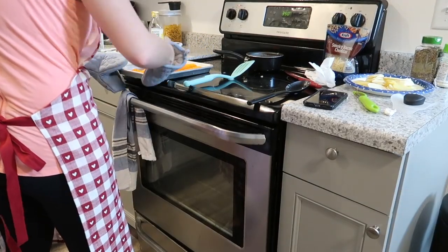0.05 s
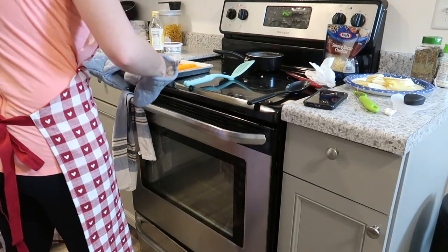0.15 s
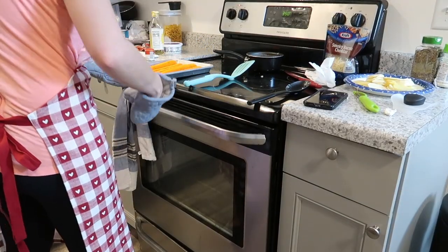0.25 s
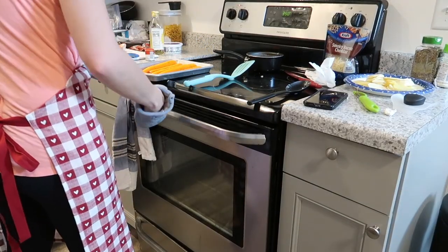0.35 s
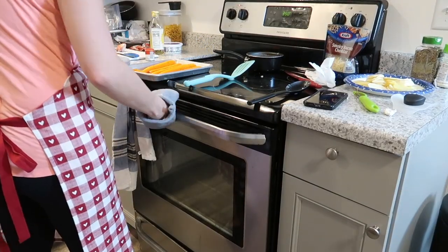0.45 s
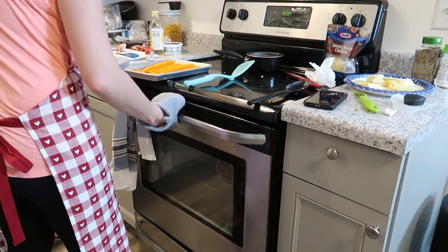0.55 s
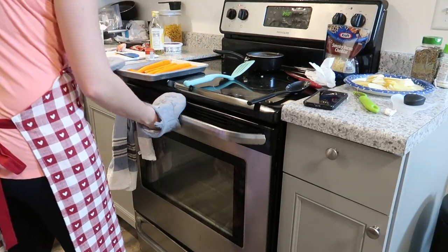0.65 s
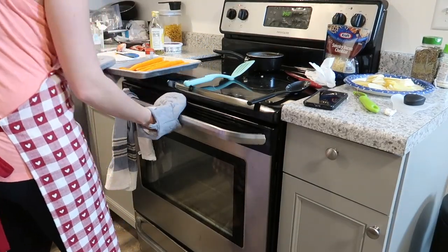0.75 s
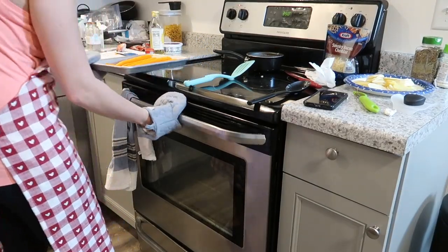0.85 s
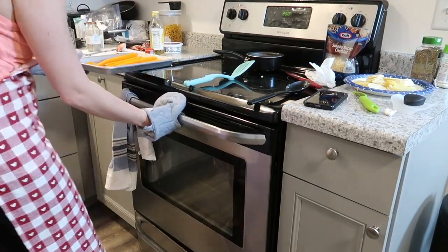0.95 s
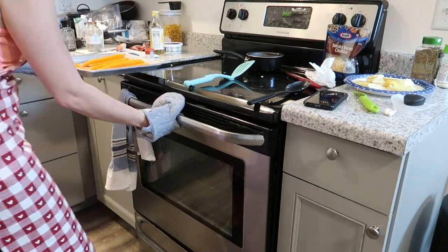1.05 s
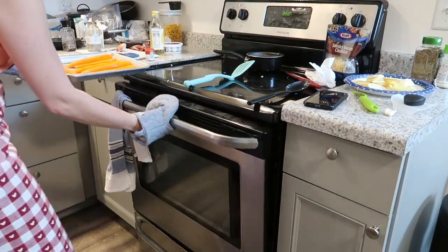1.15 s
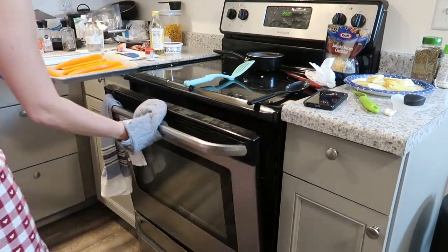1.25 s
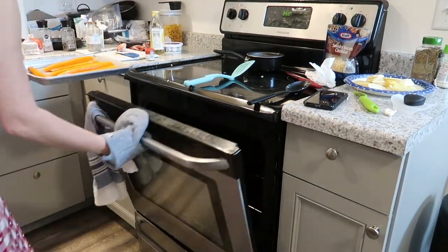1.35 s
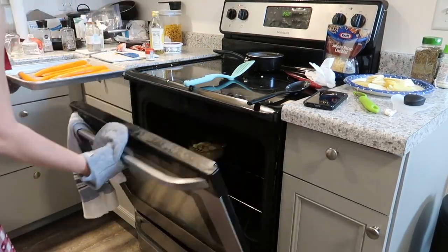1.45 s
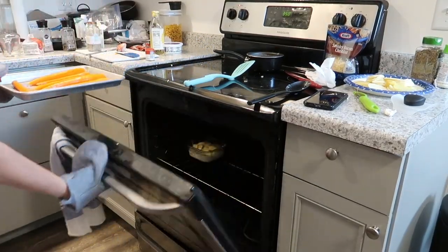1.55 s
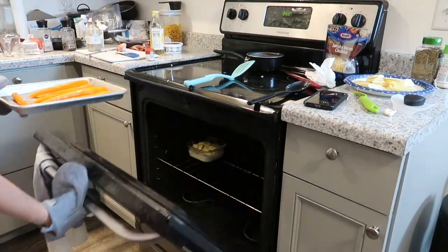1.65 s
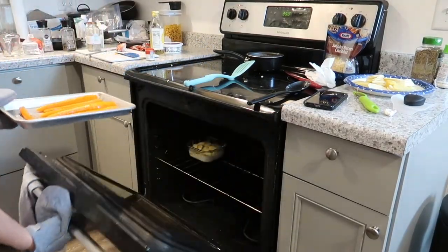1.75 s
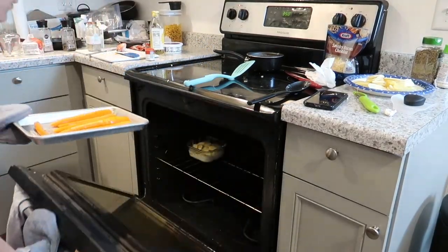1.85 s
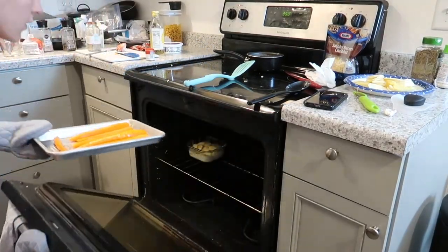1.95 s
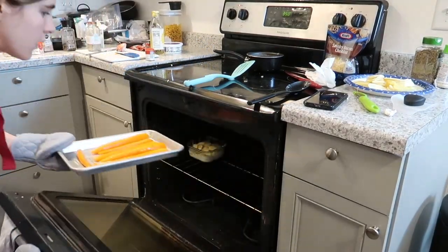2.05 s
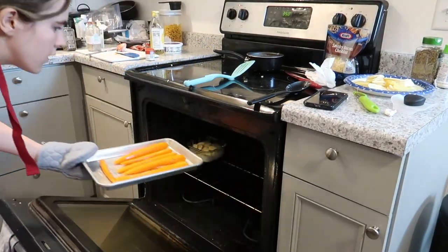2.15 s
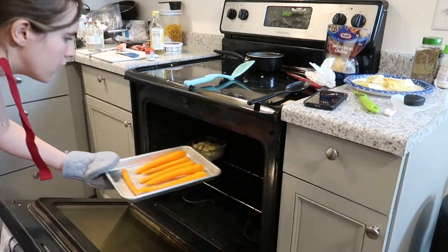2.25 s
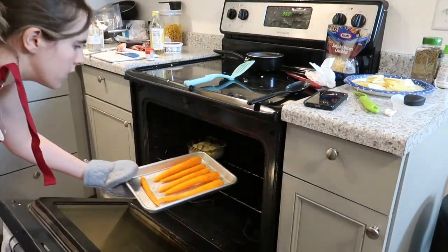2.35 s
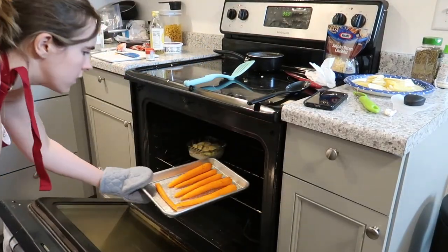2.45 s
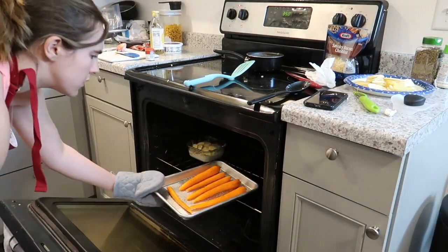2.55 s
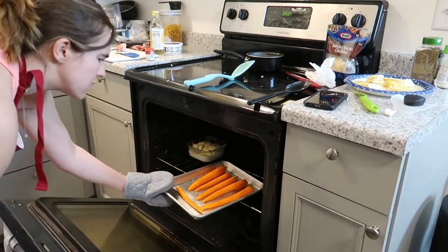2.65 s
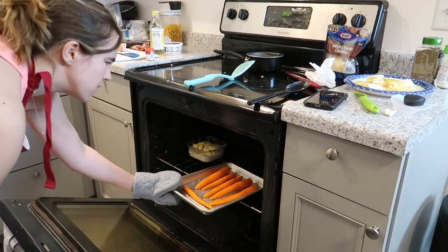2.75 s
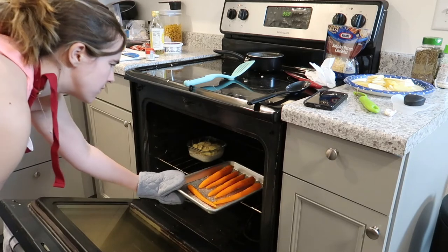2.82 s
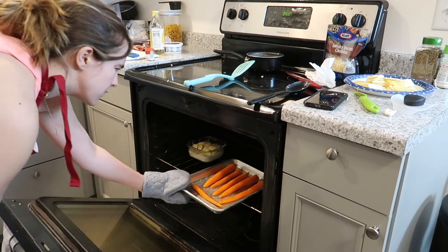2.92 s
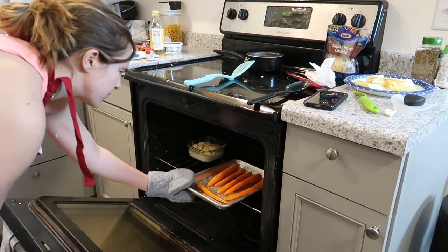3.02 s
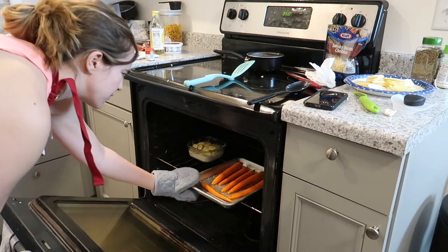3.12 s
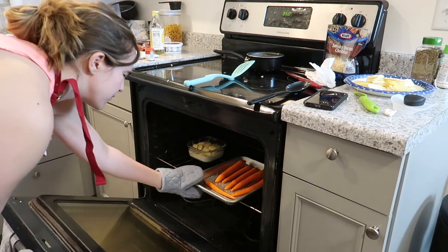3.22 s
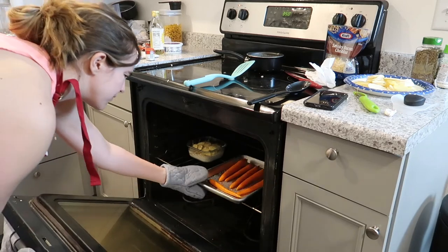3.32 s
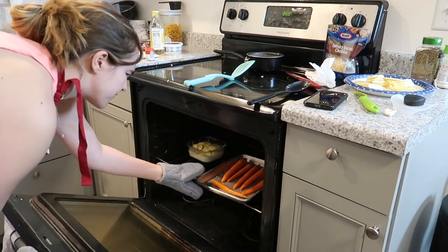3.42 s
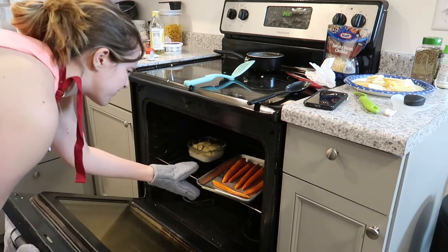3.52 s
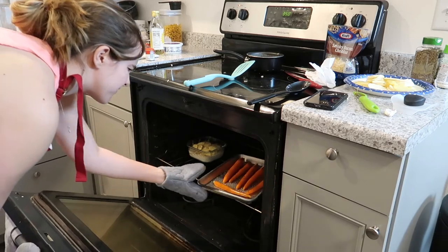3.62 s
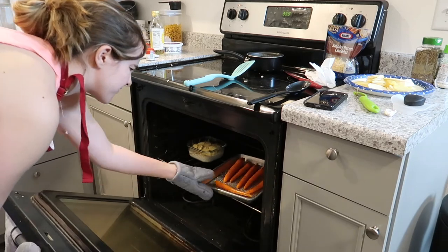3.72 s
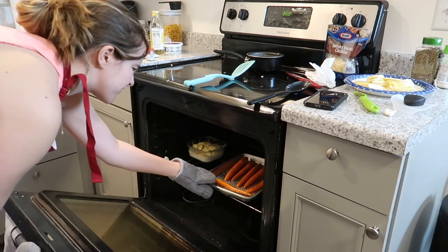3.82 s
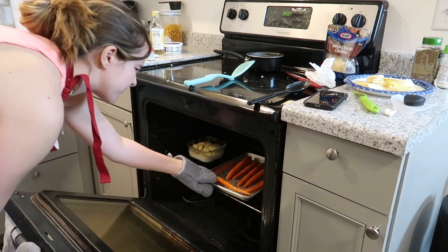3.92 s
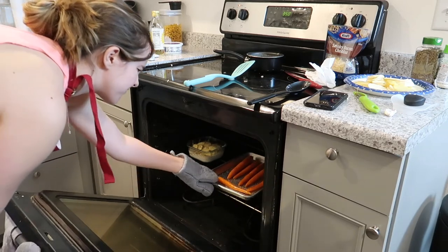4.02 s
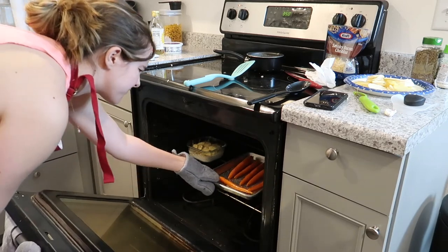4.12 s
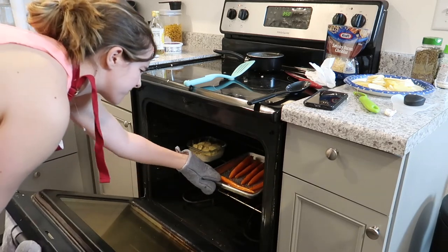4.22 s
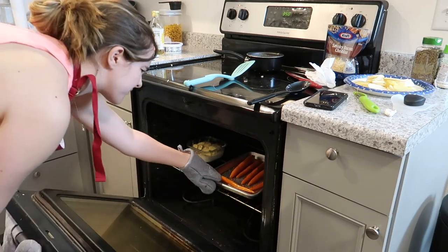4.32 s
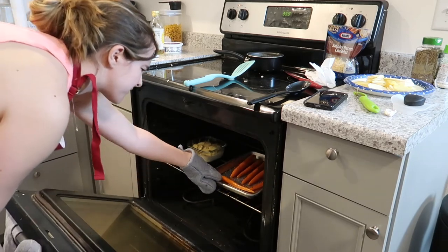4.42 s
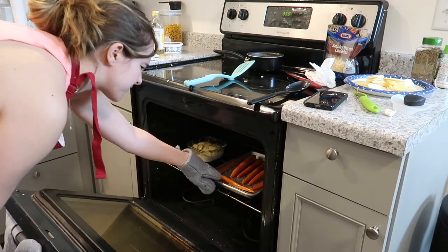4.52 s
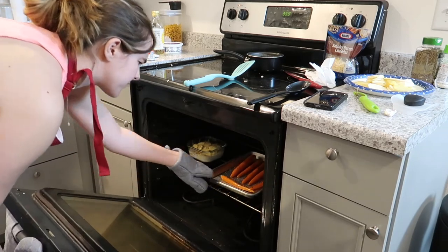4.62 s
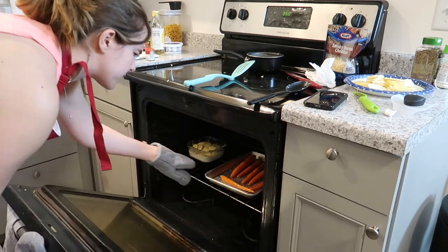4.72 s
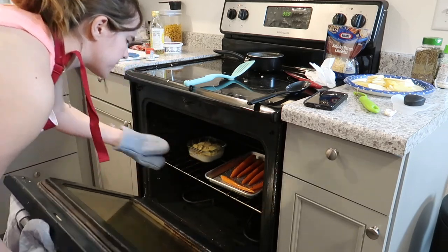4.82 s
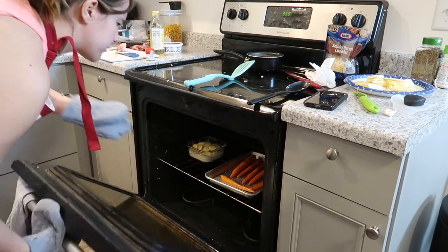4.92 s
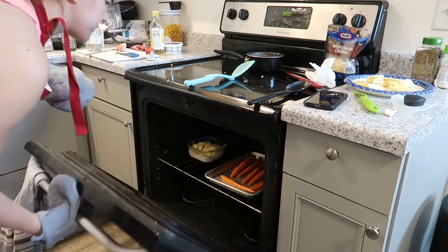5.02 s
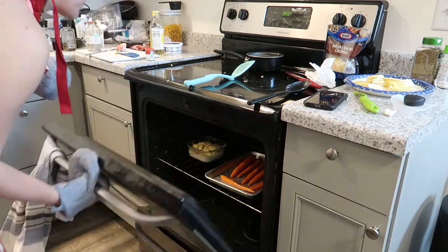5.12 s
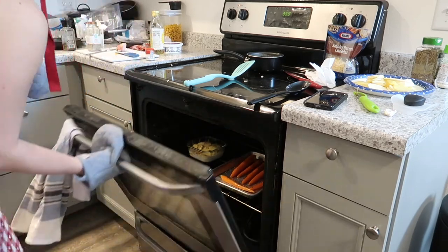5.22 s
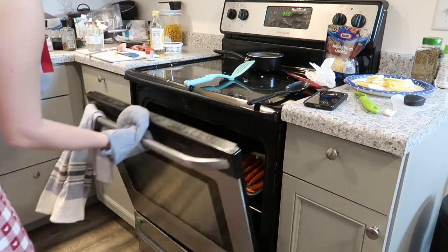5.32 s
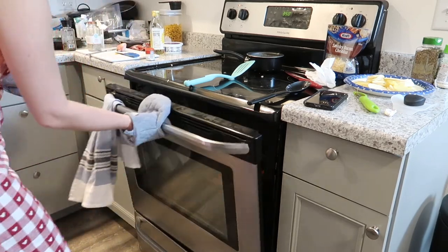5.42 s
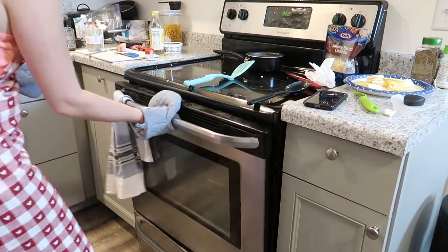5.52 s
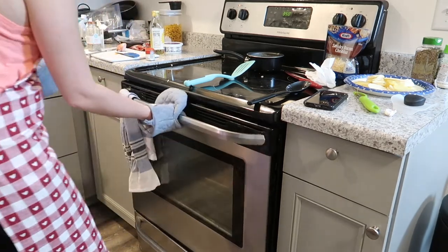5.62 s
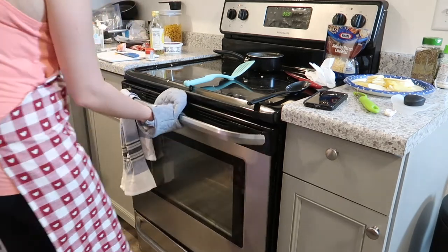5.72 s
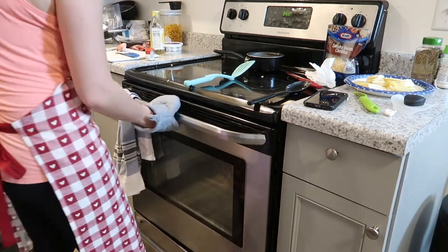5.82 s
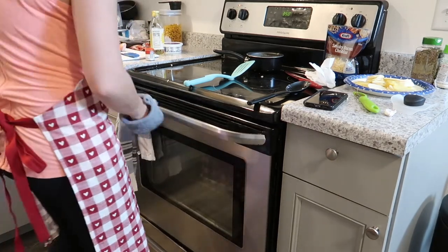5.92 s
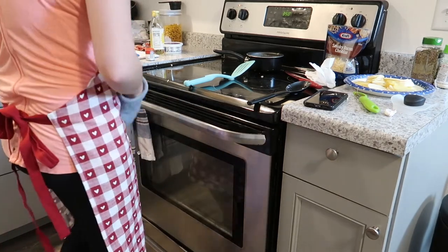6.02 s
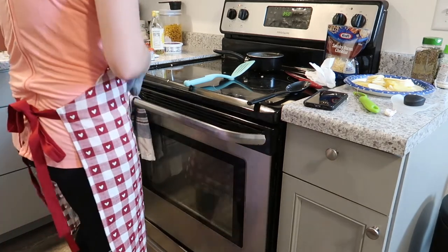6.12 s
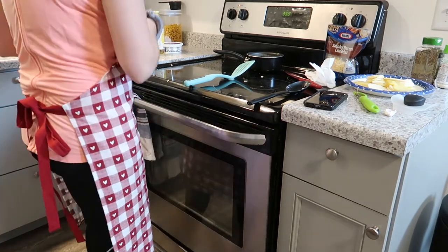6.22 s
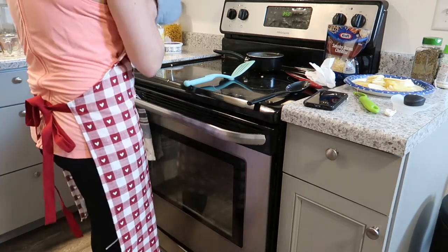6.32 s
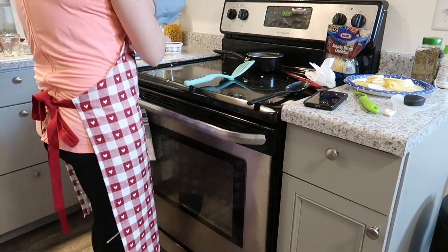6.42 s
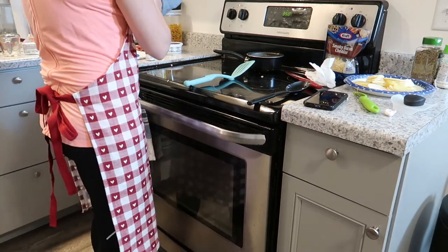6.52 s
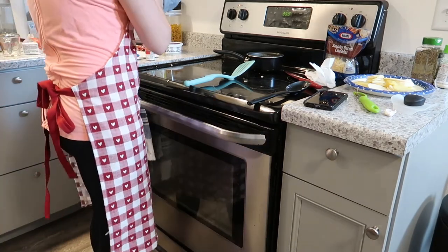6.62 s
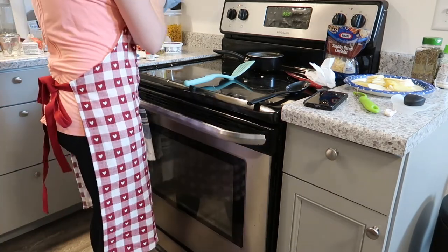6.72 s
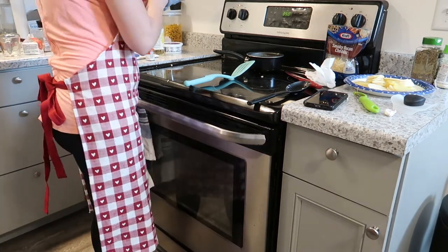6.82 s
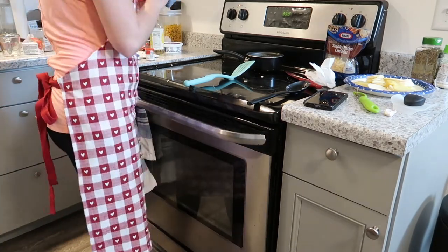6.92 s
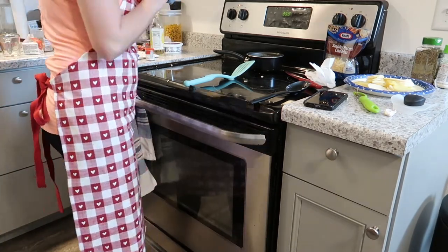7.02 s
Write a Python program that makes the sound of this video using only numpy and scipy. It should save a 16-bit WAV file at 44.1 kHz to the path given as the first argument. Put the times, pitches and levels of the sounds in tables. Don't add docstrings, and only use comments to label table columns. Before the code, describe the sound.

In a small hard-walled kitchen, close stereo microphone: a faint tray set-down, mitts rustling and ticking on the handle, then the oven door pops off its seal and drops on creaky springs. A metal tray lands on the wire rack, scrapes inward in two strokes and drops with a very loud clank. After a quieter pause the heavy door swings shut with a clunk and low thud, then cloth rustles and tiny squeaks.

```python
import sys
import numpy as np
from scipy import signal
from scipy.fft import rfft, irfft, next_fast_len
from scipy.io import wavfile
from scipy.ndimage import uniform_filter1d

SR = 44100
rng = np.random.default_rng(int(sys.argv[2]) if len(sys.argv) > 2 else 0)


def int16_out(signal):
    q = np.round(np.clip(np.atleast_2d(signal).T, -1, 1) * 32767)
    wavfile.write(sys.argv[1], SR, q.astype(np.int16))


def how_loud(loudness_db):
    steps = np.asarray(loudness_db, float) / 20
    return 10 ** steps


N = 311346
SIZE = next_fast_len(N + SR)
HZ = np.maximum(np.arange(SIZE // 2 + 1) * SR / SIZE, 1)

# (frequency [Hz], level [dB], t60 [s])
RACK_MODES = [(673, -3, 0.64), (759, 0, 0.85), (1319, -7, 5.0), (1593, -3, 1.0), (2040, -7, 2.2),
              (2471, -8, 3.1), (2821, -1, 0.44), (3359, -1, 0.35), (3607, -4, 0.42)]
# (frequency [Hz], level [dB], t60 [s])
TRAY_MODES = [(289, -13, 1), (409, -7, .18), (480, 18, .03), (545, 1, .15), (665, 0, .3), (764, -10, .3),
              (861, -5, .25), (1125, -9, .35), (1400, -6, .3), (1986, -12, .3), (2945, -17, .15),
              (3025, -17, .2), (4000, -18, .3), (4646, -22, .2)]
# (frequency [Hz], density [dB per Hz])
SCRAPE_TONE = [(88, -45), (150, -15), (352, -5), (428, -11), (519, -3), (572, -8), (740, -1), (900, -2),
               (1270, -1), (2100, -3), (8330, -31), (15500, -52)]


def at_hz(points):
    hz, db = np.array(points).T
    return np.interp(np.log(HZ), np.log(hz), db)


def rms_one(x):
    return x / np.sqrt(np.mean(x ** 2) + 1e-20)


def colour(x, tone):
    grid_hz = np.maximum(np.arange(2049) * SR / 4096, 1)
    cepstrum = irfft(np.log(how_loud(np.interp(grid_hz, HZ, at_hz(tone)))))
    cepstrum[1:2048] *= 2
    cepstrum[2049:] = 0
    pulse = irfft(np.exp(rfft(cepstrum)))
    return signal.fftconvolve(x, pulse / np.linalg.norm(pulse))[:len(x)]


def highpass_or_low(x, hz, kind):
    return signal.sosfilt(signal.butter(2, hz, kind, fs=SR, output="sos"), x)


def tilt(x, slope_db):
    low = signal.sosfilt(signal.butter(1, 2000, fs=SR, output="sos"), x)
    return low * how_loud(-slope_db) + (x - low) * how_loud(slope_db)


def drift(rate_hz):
    r = np.exp(-80 * np.pi * rate_hz / SR)
    noise = rng.standard_normal(N // 40 + 2002)
    slow = signal.lfilter([1], [1, -2 * r, r * r], noise)[2000:]
    return np.interp(np.arange(N) / 40, np.arange(len(slow)), rms_one(slow))


def swells(rows, rest_db):
    t = np.arange(0, N + 16, 16) / SR
    power = how_loud(2 * rest_db)
    for peak_s, level_db, rise_s, fall_s in rows:
        away = np.maximum((peak_s - t) / max(rise_s, .002), (t - peak_s) / max(fall_s, .002))
        power = power + how_loud(2 * (level_db - 15 * np.minimum(away, 8)))
    return np.interp(np.arange(N) / SR, t, 10 * np.log10(power))


def ring(x, hz, t60_s):
    r = how_loud(-60 / (t60_s * SR))
    w = 2 * np.pi * hz / SR
    return signal.lfilter([0, np.sin(w)], [1, -2 * r * np.cos(w), r * r], x + 1e-18)


def chatter(t60_s, rise_s=.0012):
    t = np.arange(SR // 2) / SR
    contacts = rng.standard_normal(len(t)) * how_loud(.8 * rng.exponential(1, len(t)))
    return contacts * np.minimum(t / max(rise_s, 1e-4), 1) * how_loud(-60 * t / max(t60_s, .005))


def add(out, s, x):
    i = max(round(s * SR), 0)
    out[i:i + len(x)] += x[:N - i]


def hiss():
    # (frequency [Hz], density [dB per Hz])
    hiss_tone = [(150, -10), (300, -3), (800, -3), (2500, -11), (5000, -19), (8000, -28), (12000, -42),
                 (15000, -56)]
    return how_loud(-60) * colour(rng.standard_normal(N), hiss_tone)


def rumble(stir_db):
    # (frequency [Hz], density [dB per Hz])
    rumble_tone = [(15, -30), (26, 0), (42, -13), (70, 2), (98, -8), (135, -5), (200, -11), (400, -17),
                   (800, -26), (1600, -45)]
    # (time [s], level [dB])
    steps = [(0, -46), (.55, -51), (.92, -50), (1.43, -45), (1.81, -49), (2.15, -48), (2.52, -48),
             (2.93, -47), (3.2, -46), (3.45, -49), (4.46, -50), (4.82, -47), (5.05, -49), (5.32, -46),
             (5.5, -43), (5.8, -44), (6.4, -48), (6.85, -50)]
    rise_s, fall_s, house_db, follow_share = .12, .3, -54.5, .2
    lumps = rms_one(colour(rng.standard_normal(N), rumble_tone) * how_loud(drift(6)))
    steps_db = swells([(s, db, rise_s, fall_s) for s, db in steps], -90)
    return np.hypot(how_loud(steps_db), how_loud(house_db + follow_share * stir_db)) * lumps


def cloth(motion_db):
    # (frequency [Hz], density [dB per Hz])
    rustle_tone = [(120, -31), (200, -3), (400, -2), (730, -5), (2420, -7), (3610, -9), (6000, -21),
                   (9480, -36), (14200, -52), (15500, -58)]
    # (time of most motion [s], level [dB], rise [s], fall [s])
    swishes = [
        (.68, -55, .2, .1),
        (2.2, -60, .2, .8),
        (6.22, -49, .45, .35),
        (6.82, -53, .3, .3),
    ]
    flicker_db = .8 * drift(15) + 1.2 * drift(70)
    rustle = rms_one(colour(rng.standard_normal(N) * how_loud(flicker_db), rustle_tone))
    swish = rms_one(highpass_or_low(rustle[::-1], 1800, "high"))
    return how_loud(motion_db) * tilt(rustle, -.3) + how_loud(swells(swishes, -90)) * swish


def backdrop():
    # (time of most motion [s], level [dB], rise [s], fall [s])
    moves = [(.71, -47, .2, .3), (1.1, -49, .5, .35), (1.46, -49, .15, .2), (1.86, -47.5, .5, .35),
             (2.22, -54, .25, .06), (2.3, -53, .02, .25), (2.6, -58, .4, .4), (3.09, -54, .2, .08),
             (3.73, -46, .08, .2), (4.17, -50, .1, .2), (4.42, -52, .3, .15), (4.79, -55, .1, .1),
             (5.19, -46.5, .45, .4), (5.47, -50, .1, .3), (5.93, -43, .3, .38), (6.48, -50, .2, .2),
             (6.65, -48.5, .1, .4), (6.96, -50, .2, .1)]
    still_db = -68
    motion_db = swells(moves, still_db)
    return cloth(motion_db) + rumble(motion_db - still_db) + hiss()


def squeaks():
    # (time [s], length [s], start [Hz], end [Hz], level [dB])
    squeak_rows = [
        (1.54, .08, 6900, 6600, -65),
        (2.23, .03, 3800, 3450, -54),
        (2.283, .13, 1820, 2120, -46),
        (6.0, .27, 5480, 5450, -54),
        (6.0, .22, 3600, 3450, -57),
        (6.02, .07, 205, 195, -40),
        (6.95, .05, 1520, 1500, -46),
    ]
    out = np.zeros(N)
    for s, length_s, start_hz, end_hz, level_db in squeak_rows:
        part = np.linspace(0, 1, round(length_s * SR))
        tremble = uniform_filter1d(rng.standard_normal(SR), size=150)[:len(part)] * 12
        tremble_hz = min(.06 * start_hz, 130) * tremble
        hz = start_hz + (end_hz - start_hz) * part + tremble_hz
        tone = np.sin(2 * np.pi * np.cumsum(hz) / SR)
        onset = np.minimum(part / length_s / .5, 1)
        add(out, s, how_loud(level_db) * tone * how_loud(3 * drift(40)[:len(part)]) * onset * (1 - part) ** .7)
    return out


def thuds():
    # (time [s], peak [dB], frequency [Hz], t60 [s])
    thud_rows = [
        (1.183, -31, 340, .1),
        (1.425, -34, 130, .15),
        (1.765, -37, 290, .2),
        (3.79, -35, 510, .12),
        (3.835, -35, 170, .15),
        (5.45, -31, 72, .3),
        (5.47, -33, 380, .2),
        (5.745, -28, 66, .25),
        (5.75, -34, 125, .2),
        (5.75, -34, 28, .5),
    ]
    out = np.zeros(N)
    for s, peak_db, hz, t60_s in thud_rows:
        swing = highpass_or_low(ring(chatter(.08), hz, t60_s), hz * 1.6, "low")
        add(out, s, how_loud(peak_db) * swing / np.abs(swing).max())
    return out


def ticks():
    # (time [s], peak [dB], centre [Hz])
    tick_rows = [(0.612, -39, 2400), (0.703, -28, 1910), (0.791, -33, 1070), (0.951, -32, 2190),
                 (1.029, -37, 2130), (1.11, -32.5, 1720), (1.139, -32, 1500), (1.66, -40, 1500),
                 (1.687, -39, 1530), (1.749, -37, 961), (2.964, -25, 1210), (3.139, -16, 1290),
                 (3.654, -39, 1800), (3.71, -27, 2340), (3.789, -23, 1700), (3.812, -29, 2900),
                 (4.151, -26, 2600), (4.399, -39, 1330), (4.917, -43, 1140), (5.453, -38, 2230),
                 (5.56, -40, 1700), (5.707, -16, 2150), (6.471, -30.5, 2500), (6.569, -40, 2190),
                 (6.633, -31.5, 1660)]
    out = np.zeros(N)
    band = signal.butter(2, [750, 4000], "band", fs=SR, output="sos")
    for s, peak_db, hz in tick_rows:
        burst = signal.sosfilt(np.vstack([band, band]), chatter(.16, .0006))
        knock = burst + .03 * ring(burst, hz, .014) + .015 * ring(burst, hz * 1.75, .02)
        add(out, s, how_loud(peak_db - 1.2) * knock / np.abs(knock).max())
    return out


def drag():
    # (time of most force [s], level [dB], rise [s], fall [s])
    strokes = [
        [(2.862, -33, .004, .2), (2.95, -35.5, .1, .14)],
        [(3.141, -29, .002, .05), (3.177, -22.5, .04, .055), (3.26, -30, .1, .1), (3.335, -27.5, .18, .18),
         (3.61, -48, .1, .02)],
    ]
    out = np.zeros(N)
    for shoves in strokes:
        start = round((shoves[0][0] - .01) * SR)
        clicks = rng.standard_normal(SR) * how_loud(1.1 * rng.exponential(1, SR))
        slips = clicks * (rng.random(SR) < 12000 / SR)
        slips = slips * how_loud(1.6 * drift(30)[:SR])
        modes = RACK_MODES + TRAY_MODES[4:9]
        body = rms_one(sum(how_loud(db * .4) * ring(slips, hz, .05) for hz, db, _ in modes))
        scrape = rms_one(colour(slips, SCRAPE_TONE)) + .6 * body
        force_db = swells(shoves, -90)[start:start + SR]
        lean_db = np.clip(.3 * (force_db + 31), -2, 3)
        add(out, start / SR, how_loud(force_db - 1.9) * tilt(scrape, lean_db))
    return out


def blow(peak_db, t60_s, ring_db, shudder, tone, shudder_tone, modes):
    t = np.arange(SR // 2) / SR
    touch = np.pad(np.hanning(6) / 2.5, (0, SR // 2 - 6))
    crack = colour(chatter(t60_s), tone)
    crack = crack / np.abs(crack).max()
    rings = sum(how_loud(db) * rng.choice([-1, 1]) * ring(touch, hz, min(decay_s, 1)) for hz, db, decay_s in modes)
    shudder_db, shudder_t60_s = shudder
    shake = tilt(colour(rng.standard_normal(len(t)), shudder_tone), 1 - 14 * t)
    shake = shake * how_loud(1.5 * drift(40)[:len(t)])
    shake = shake * how_loud(shudder_db - 60 * t / shudder_t60_s) * np.minimum(t / .004, 1)
    return how_loud(peak_db) * (crack + how_loud(ring_db) * rings) + shake


def blows():
    # (time [s], peak [dB], chatter t60 [s], ringing [dB])
    set_down = (0.0, -22, .05, -48)
    unseal = (1.178, -18, .15, -22)
    landing = (2.844, -15.5, .05, -32)
    clank = (3.8315, 1.5, .036, -22)
    latch = (5.7015, -9, .045, -22)
    # (frequency [Hz], density [dB per Hz])
    set_down_tone = [(59, -47), (100, -17), (430, -3), (660, -5), (1090, -11), (2270, -11), (5960, -27),
                     (8880, -38), (9860, -81), (15000, -100)]
    unseal_tone = [(88, -44), (150, -26), (380, -20), (800, -21), (1200, -12), (1700, -15), (2300, -4),
                   (2900, -1), (3410, -4), (3830, 1), (5440, -21), (7000, -25), (12500, -26), (15500, -33)]
    landing_tone = [(88, -51), (150, -21), (607, -12), (1040, -17), (1910, 2), (2860, -17), (3900, 0),
                    (4650, -15), (9540, -31), (13800, -47), (15500, -92)]
    clank_tone = [(35, -58), (100, -27), (270, -8), (500, 1), (900, -11), (1400, -8), (2050, -11),
                  (2500, -17), (3100, -14), (3600, -20), (4320, -17), (5710, -33), (13000, -41),
                  (15500, -61)]
    latch_tone = [(88, -49), (200, -22), (340, -13), (700, -22), (1110, -18), (1700, 1), (2200, -5),
                  (3000, -12), (3480, -10), (3830, 1), (5540, -18), (8830, -36), (14100, -32), (15500, -47)]
    # (frequency [Hz], density [dB per Hz])
    unseal_shudder = [(120, -44), (200, -14), (352, -4), (874, -16), (1150, -5), (1300, -9), (3480, -9),
                      (9310, -36), (11200, -29), (15500, -80)]
    clank_shudder = [(47, -51), (80, -21), (281, -11), (477, -12), (649, -2), (1030, -13), (3000, -19),
                     (6500, -27), (9760, -39), (10700, -53), (12200, -42), (15500, -106)]
    latch_shudder = [(120, -43), (200, -16), (352, -4), (525, -14), (800, -14), (1600, -9), (3890, -9),
                     (10200, -39), (14200, -46), (15500, -82)]
    # (rms [dB], t60 [s])
    shudders = [
        (-27, .36),
        (-31, .36),
        (-43, .3),
        (-21, .3),
        (-31, .55),
    ]
    # (frequency [Hz], level [dB], t60 [s])
    frame_modes = [(350, -14, .15), (1190, 0, .55), (2293, -3, .12), (3461, -5, .15), (3903, -8, .12),
                   (4950, -11, .5), (10280, -16, .2)]
    glass_modes = [(345, -2, .2), (1500, -2, .06), (1680, 0, .08), (2190, -1, .08), (3079, -6, .08),
                   (3822, 0, .1), (5200, -12, .1), (6126, -18, .15)]
    events = [(set_down, set_down_tone, set_down_tone, TRAY_MODES),
              (unseal, unseal_tone, unseal_shudder, frame_modes),
              (landing, landing_tone, SCRAPE_TONE, RACK_MODES),
              (clank, clank_tone, clank_shudder, TRAY_MODES),
              (latch, latch_tone, latch_shudder, glass_modes)]
    out = np.zeros(N)
    for shudder, (hit, tone, shudder_tone, modes) in zip(shudders, events):
        s, peak_db, t60_s, ring_db = hit
        add(out, s, blow(peak_db, t60_s, ring_db, shudder, tone, shudder_tone, modes))
    return out


def kitchen(x):
    # (octave centre [Hz], t60 [s])
    octaves = [(90, .5), (180, .55), (360, .38), (720, .42), (1400, .6), (2800, .6), (5600, .45),
               (11000, .25)]
    t, tail = np.arange(SR) / SR, 0
    for hz, t60_s in octaves:
        echoes = highpass_or_low(rng.standard_normal(SR), [hz / np.sqrt(2), hz * np.sqrt(2)], "band")
        tail = tail + echoes * how_loud(-60 * t / t60_s)
    tail = tail * np.minimum(t / .006, 1)
    return signal.fftconvolve(x, tail / np.linalg.norm(tail))[:N]


def ports(mid, gap, steady, diffuse):
    scatter = rng.standard_normal(9000) * how_loud(np.linspace(0, -40, 9000))
    spread = steady * 1j + diffuse * rfft(scatter / np.linalg.norm(scatter), SIZE)
    side = irfft(rfft(mid, SIZE) * spread * how_loud(at_hz(gap)), SIZE)[:N]
    return np.array([mid + side, mid - side])


def scene():
    # (frequency [Hz], side minus mid [dB])
    near_gap = [(60, -38), (150, -20), (500, -23), (1000, -21), (2000, -17), (4000, -6), (8000, 6),
                (14000, 5)]
    diffuse_gap = [(60, -36), (110, -22), (200, -11), (380, -9), (700, -11), (1290, -10), (2380, -11),
                   (4400, -6), (8120, 1), (11000, 4), (15000, 3)]
    far = squeaks() + backdrop()
    metal, rub = blows() + ticks(), drag()
    near = metal + rub + how_loud(-11) * kitchen(metal + .6 * rub) + thuds()
    return ports(near, near_gap, .4, .65) + ports(far, diffuse_gap, .3, .9)


def band_limit(x):
    return signal.sosfilt(signal.butter(12, 15600, fs=SR, output="sos"), x)


def record(dry):
    rolloff = signal.butter(4, 14300, fs=SR, output="sos")
    return band_limit(signal.sosfilt(rolloff, np.clip(dry, -1, 1)))


dry = scene()
out = record(dry)
int16_out(out)
```